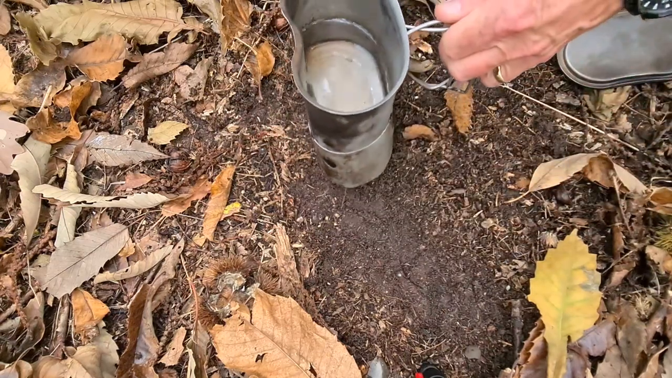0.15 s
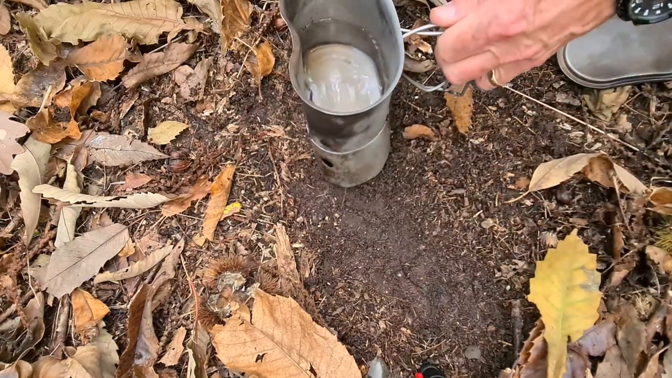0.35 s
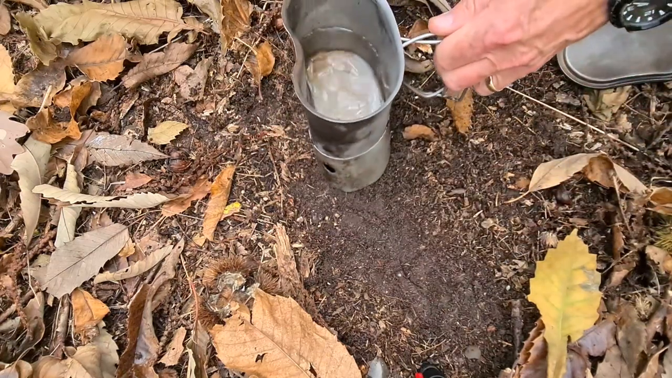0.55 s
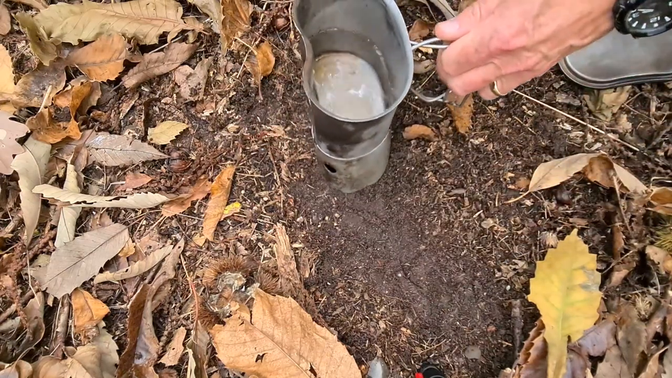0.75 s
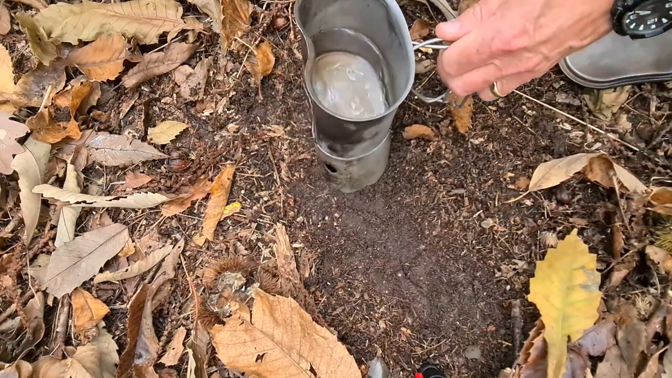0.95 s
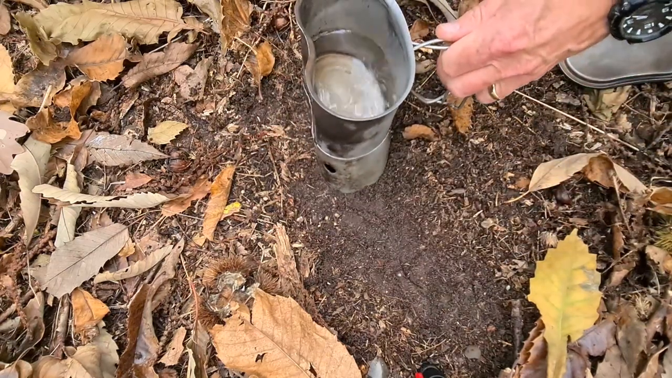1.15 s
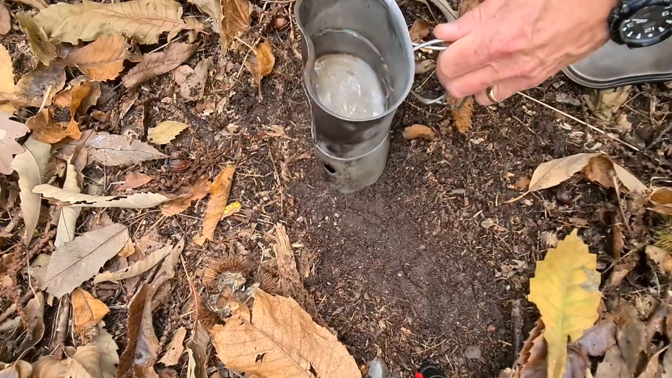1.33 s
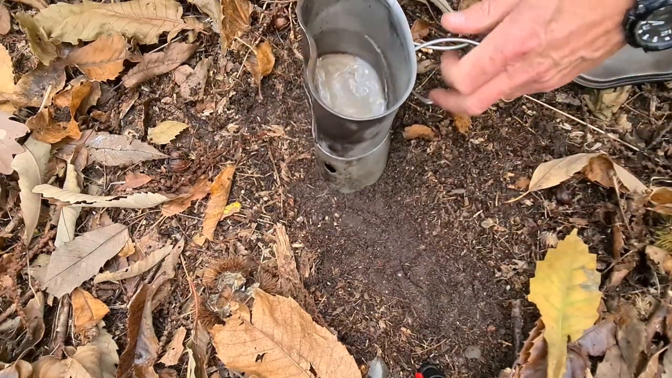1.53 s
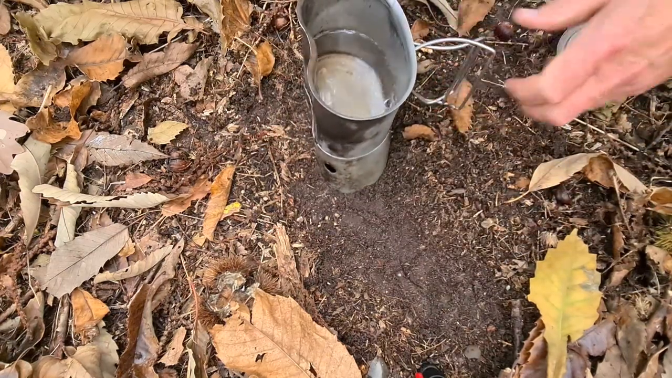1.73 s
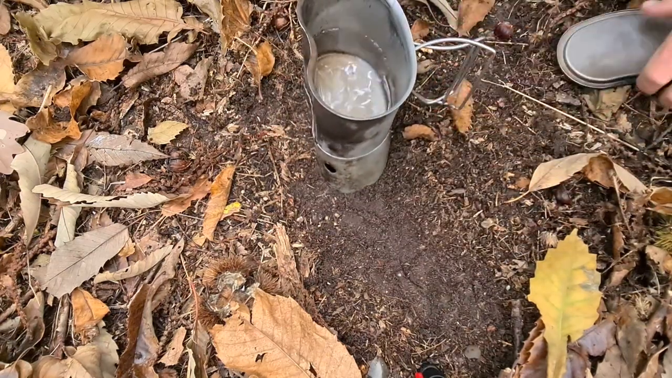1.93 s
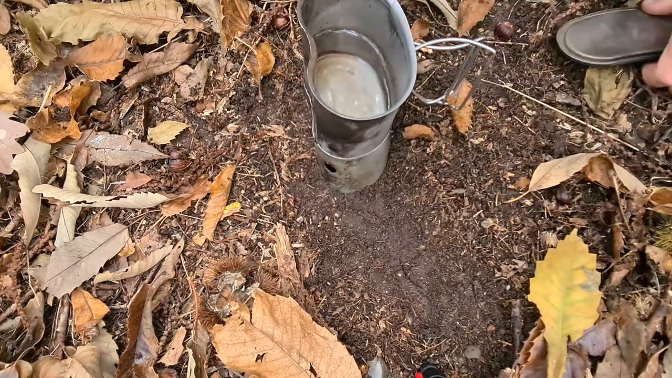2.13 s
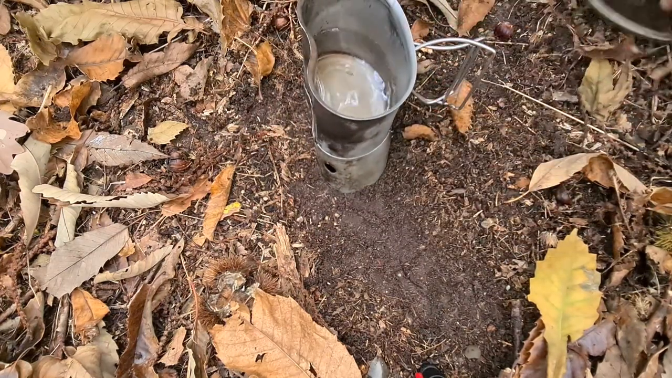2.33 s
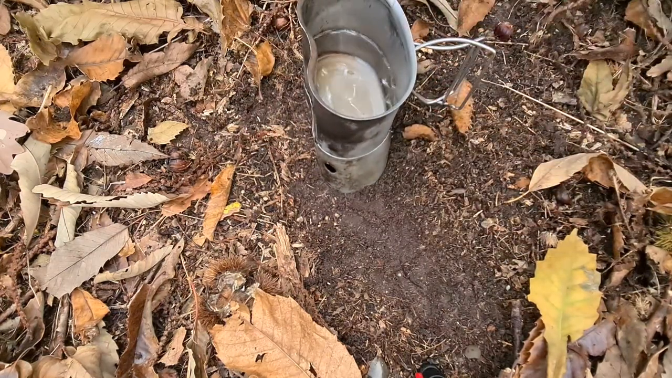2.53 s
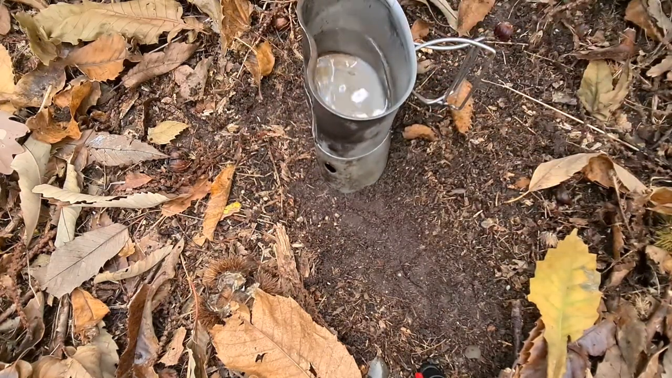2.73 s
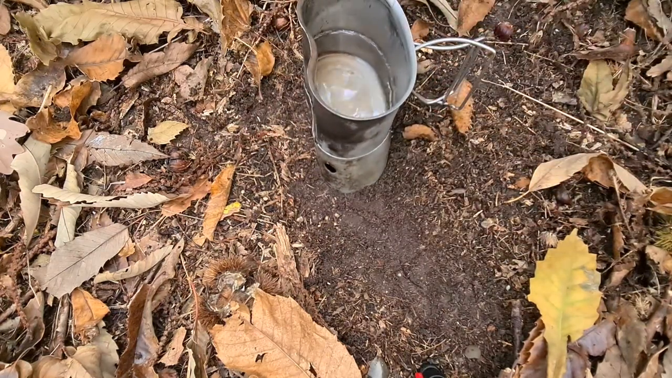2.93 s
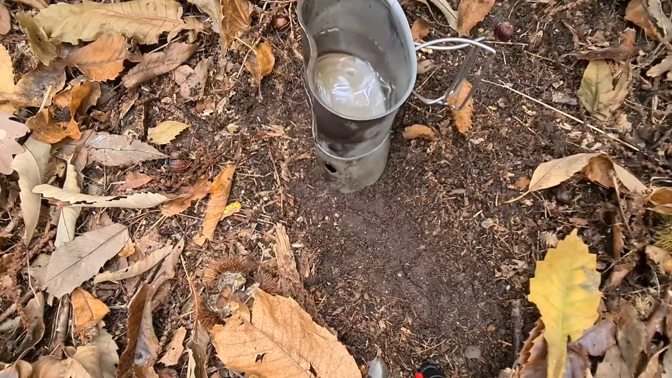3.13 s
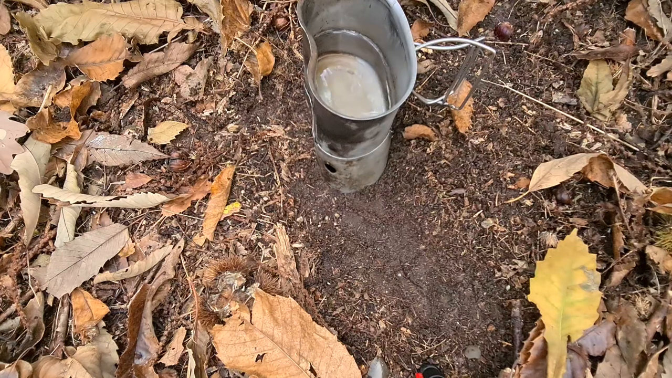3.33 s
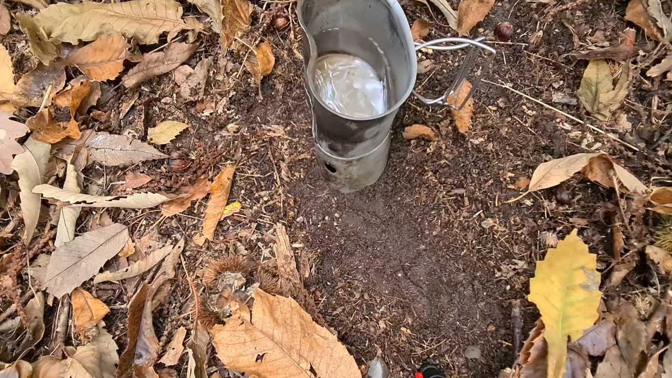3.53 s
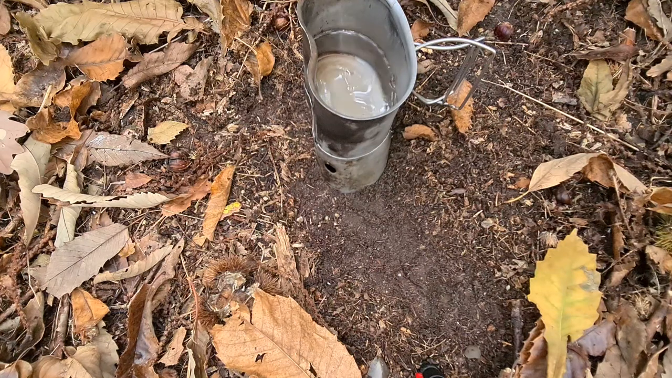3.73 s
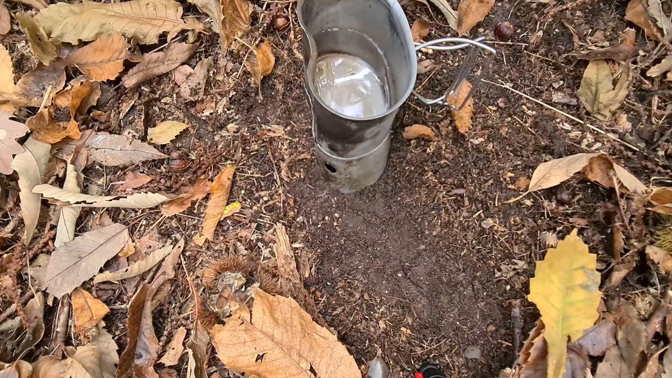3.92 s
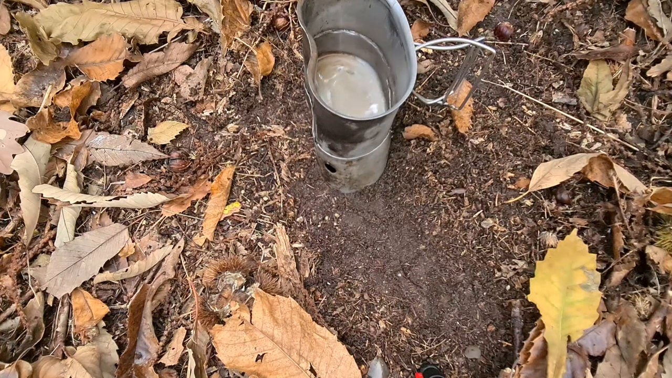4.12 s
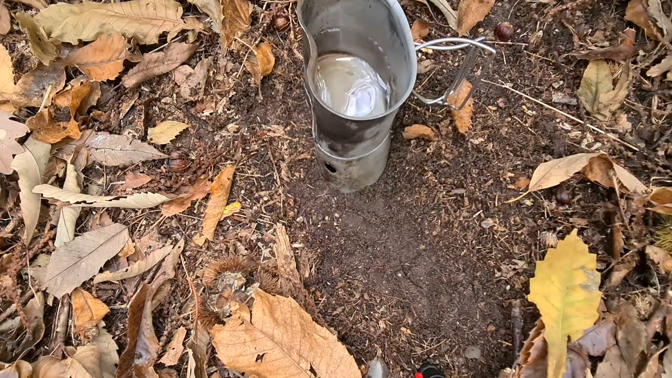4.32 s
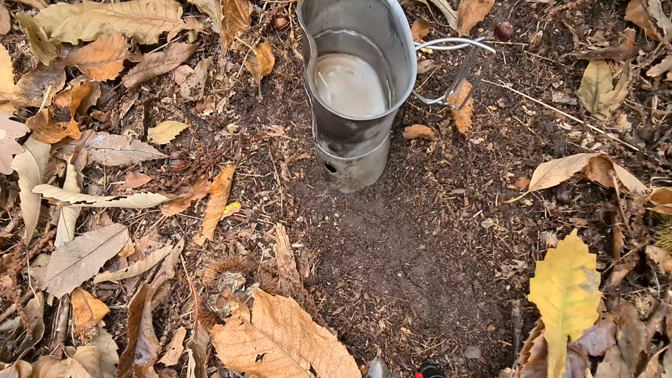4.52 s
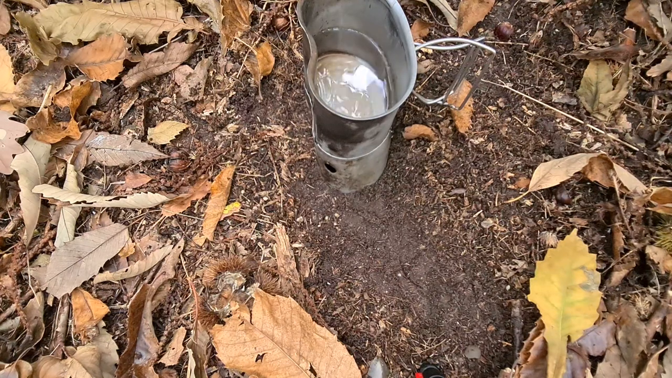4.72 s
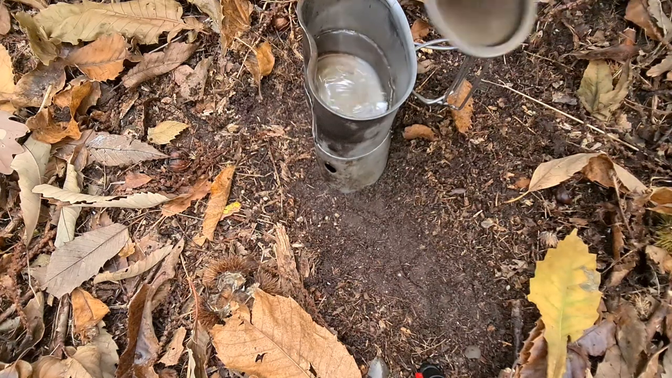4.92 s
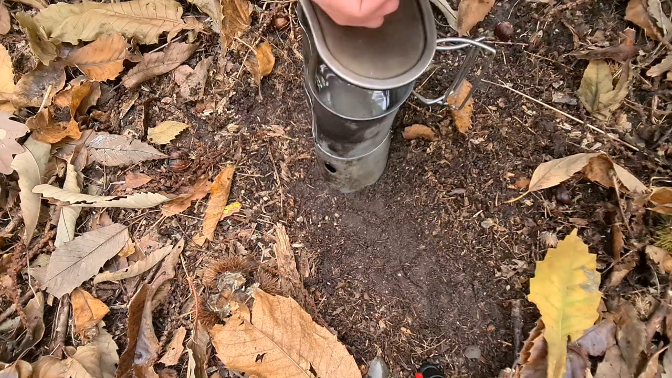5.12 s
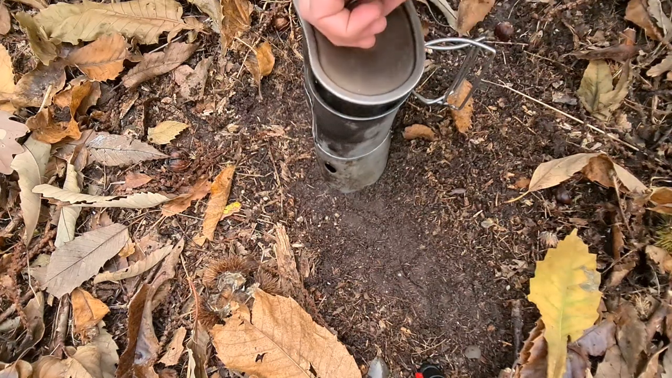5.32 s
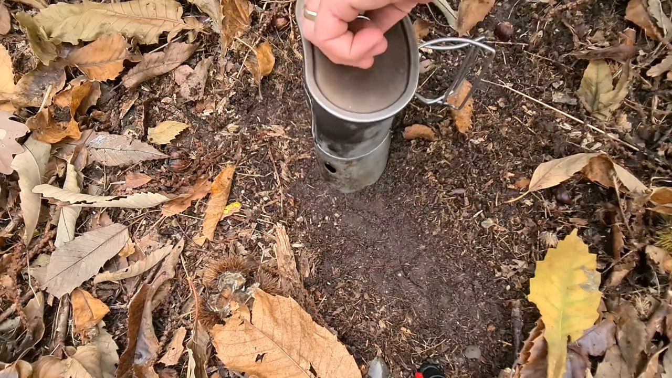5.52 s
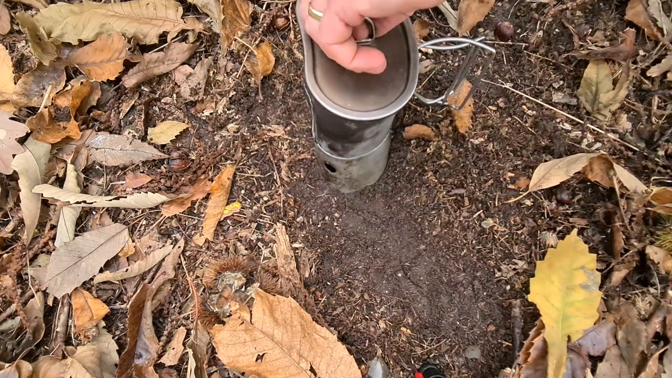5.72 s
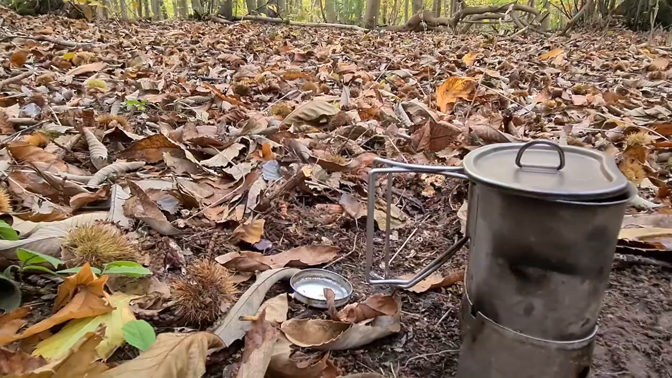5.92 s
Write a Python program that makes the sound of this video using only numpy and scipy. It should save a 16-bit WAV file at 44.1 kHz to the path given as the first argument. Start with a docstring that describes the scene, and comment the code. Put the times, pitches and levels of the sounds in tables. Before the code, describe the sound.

A metal camping pot scrapes on its stand in a quiet wood, leaves rustle, a lid clinks and clanks on, then a close simmering hiss.

```python
"""A metal camping pot is nudged into place on its burner stand in a wood; its lid, pulled out of dry leaves,
clinks in the hand, has its wire loop flipped up and clanks onto the pot: decaying modes plus a wash of noise.
Far off an engine idles as beating sine orders, small birds whistle faintly, and noise makes roar and rumble.
Leaves and sleeve are crackling noise. At the very end the microphone is suddenly close to the pot, which
hisses and ticks over the flame: grainy noise, short bursts and two resonances."""
import sys
import numpy as np
from scipy import signal
from scipy.fft import rfft, irfft, next_fast_len
from scipy.io import wavfile
from scipy.ndimage import uniform_filter1d, map_coordinates

SR = 44100
rng = np.random.default_rng(int(sys.argv[2]) if len(sys.argv) > 2 else 0)


def unload_wav(signal):
    """Save mono or channel-first audio to the path in sys.argv[1] as 16-bit WAV at rate SR, clipped to [-1, 1]."""
    wavfile.write(
        sys.argv[1],
        SR,
        np.round(np.clip(np.atleast_2d(signal).T, -1, 1) * 32767).astype(np.int16),
    )


N = 267246


def amp(db):
    """Decibels to gain."""
    return 10 ** (np.asarray(db) / 20)


def unit(x):
    """Scale to rms 1."""
    return x / np.sqrt(np.mean(x ** 2) + 1e-20)


def clock():
    """The time of every sample in seconds."""
    return np.arange(N) / SR


def along(points, hz):
    """(Hz, value) points joined on a log frequency axis."""
    f, v = np.transpose(points)
    return np.interp(np.log(hz + 1), np.log(f + 1), v)


def curves(rows):
    """One value per sample for each column after the time."""
    s, *cols = np.transpose(rows)
    return [np.interp(clock(), s, c) for c in cols]


def wobble(rate):
    """A smooth random curve, rate knots a second."""
    return map_coordinates(rng.standard_normal(400), [clock() * rate], mode="mirror")


def ripple(hz, depth_db):
    """Crowded resonances: random peaks and dips in dB, with knots 90 Hz apart."""
    return depth_db * map_coordinates(rng.standard_normal(300), [hz / 90], mode="mirror")


def filtered(x, response):
    """x times a response of frequency."""
    n = x.shape[-1]
    padded = next_fast_len(n + 8192)
    hz = np.fft.rfftfreq(padded, 1 / SR)
    return irfft(rfft(x, padded) * response(hz), padded)[..., :n]


def stereo(pair, colour, alike):
    """Two unrelated signals become left and right, jointly of rms 1, with a colour in dB and a likeness."""
    def mid_side_gains(hz):
        turn = np.arccos(np.clip(along(alike, hz), -1, 1)) / 2
        return amp(colour(hz)) * [np.cos(turn), np.sin(turn)]

    mid, side = filtered(pair, mid_side_gains)
    return unit(np.array([mid + side, mid - side]))


def rush(spectrum, alike):
    """Smooth coloured stereo noise."""
    return stereo(rng.standard_normal((2, N)), lambda hz: along(spectrum, hz), alike)


def patches(x, depth_db):
    """Shifting, short-lived resonances: a random gain over frequency and time."""
    z = signal.stft(x, nperseg=512)[2]
    field = uniform_filter1d(rng.standard_normal(z.shape[1:]), size=5, axis=0)
    field = uniform_filter1d(field, size=6, axis=1)
    patched = signal.istft(z * amp(depth_db * unit(field)), nperseg=512)[1]
    return unit(patched[:, :N])


# Left-right likeness at the microphone, all but the closest metal: freq_hz, correlation
LIKENESS = [(60, 0.93), (130, 0.93), (290, 0.63), (640, 0.34), (1400, -0.31), (3000, -0.1), (8000, -0.016)]


def crackle(spectrum, rate, spread_db, smooth):
    """Millisecond grains of very unequal size and colour on a bed of smooth noise."""
    starts = rng.random(N) < rate / SR
    sizes = starts * amp(spread_db * np.minimum(rng.exponential(size=N), 3))
    grains = unit(signal.lfilter([1], [1, -np.exp(-1 / (0.0021 * SR))], sizes))
    noise = (grains + smooth) * rng.standard_normal((2, N))
    return patches(stereo(noise, lambda hz: along(spectrum, hz), LIKENESS), depth_db=3)


def add(track, s, sound):
    """Mix a sound into the track at time s."""
    part = track[:, round(s * SR):][:, :sound.shape[1]]
    part += sound[:, :part.shape[1]]


def swell(s, db, half):
    """A bell-shaped rise and fall in amplitude around time s."""
    return amp(db) * np.exp(-.5 * ((clock() - s) / half) ** 2)


def strokes(rows, attack_s, t60):
    """Level of movements: each rises, holds until its length is over and dies away."""
    t = clock()
    level = np.zeros(N)
    for s, length, db in rows:
        fall_db = 60 * np.maximum(t - s - length, 0) / t60
        level += amp(db - fall_db) * np.clip((t - s) / attack_s, 0, 1)
    return level


def snaps(rows, spectrum, t60):
    """Tiny dry cracks: bursts of noise that die at once."""
    track, t = np.zeros((2, N)), np.arange(SR // 50) / SR
    for s, db in rows:
        burst = stereo(rng.standard_normal((2, len(t))), lambda hz: along(spectrum, hz), LIKENESS)
        add(track, s, amp(db - 60 * t / t60) * burst)
    return track


# Left-right likeness of metal wash and simmer close by: freq_hz, correlation
NEAR_LIKENESS = [(130, 1), (640, .76), (1400, 0.73), (3100, -0.17), (15000, 0.59)]
# a faint lead-in swells before each contact
LEAD_IN_S = .04
# a contact that chatters for this long is loose and damps the metal less
LOOSE_S = 0.0196
# treble of a contact: dB gained per dB of force, and dB lost per dB of bass
TREBLE_PER_FORCE, TREBLE_PER_BASS = 0.29, 0.24
# the left port hears the metal first; its phase lead, half on each side, levels off for short waves
PORT_LEAD_S, MOST_APART_RAD = .00009, 0.99


def contacts(rows, modes, spectrum, wash_db, wash_t60, treble_db, damping, lead_in_db, lead_in_t60):
    """Metal on metal: a faint lead-in, then clear modes and a wash of noise; chatter slows the early decay."""
    track, t = np.zeros((2, N)), np.arange(SR // 2) / SR - LEAD_IN_S
    hz, mode_db, t60 = np.transpose(modes)[:, :, None]
    hardest_db = max(row[1] for row in rows)
    apart = np.minimum(np.pi * hz * PORT_LEAD_S, MOST_APART_RAD)
    age = np.maximum(t, 0)
    lead_in = amp(lead_in_db + 60 * np.minimum(t, 0) / lead_in_t60)
    onset = lead_in + (1 - lead_in) * (1 - np.exp(-age / .0003))
    for s, db, bass_db, chatter in rows:
        # hard blows on the edge are bright, soft and flat ones dull
        high_db = treble_db + TREBLE_PER_FORCE * (db - hardest_db) - TREBLE_PER_BASS * bass_db
        tilt = lambda f: along([(700, bass_db), (2600, 0.0023), (7000, high_db)], f)
        # a firm contact shortens the ring
        grip = 1 + damping * np.exp(-chatter / LOOSE_S)
        fade = lambda life: amp(-60 * grip * (np.hypot(age, chatter) - chatter) / life)
        # the shifting contact jostles the phase of every mode
        jostle = 0.03 * np.cumsum(rng.standard_normal((len(hz), len(t))), axis=1)
        phase = 2 * np.pi * (hz * t + rng.random(hz.shape)) + jostle
        partials = amp(mode_db + tilt(hz) + rng.normal(0, 2.4, hz.shape))
        ringing = partials * fade(t60)
        ring = np.array([(ringing * np.sin(phase + side * apart)).sum(0) for side in (1, -1)])
        ring *= np.sqrt(2) / np.linalg.norm(partials)
        colour = lambda f: along(spectrum, f) + tilt(f) + ripple(f, 4.5)
        wash = stereo(rng.standard_normal((2, len(t))), colour, NEAR_LIKENESS)
        sound = ring + amp(wash_db) * wash * fade(wash_t60)
        add(track, s - LEAD_IN_S, amp(db) * onset * sound / np.hypot(1, amp(wash_db)))
    return track


# Far engine's slow cycle: time_s, cycle_rate_hz
ENGINE_SPEED = [(0, 19.3), (.8, 19.85), (1.5, 19.3), (3, 18.8), (4, 18.98), (4.8, 18.1), (5.9, 18.8)]
# How loud the firing tone arrives from far off: time_s, level_db
FIRING_LEVEL = [(0.0, -50.5), (0.13, -40.5), (1.8, -52), (2.11, -43.5), (2.57, -41.5), (4.1, -53),
                (4.6, -58), (5.57, -43.5), (5.92, -45)]
# The other orders before their joint levelling: multiple_of_cycle_rate, level_db
ENGINE_ORDERS = [(3, -22), (5, 3), (6, -22), (7, -10), (8, -3.5), (9, -8), (10, -13), (11, -23.5), (12, -8),
                 (13, -10), (14, -20), (16, -12.5), (17, -16)]
# Far roar of the open air: time_s, level_db
ROAR_LEVEL = [(0, -52.5), (.6, -51), (1.1, -51.5), (1.35, -50.5), (1.7, -54), (2.2, -50), (2.8, -54),
              (4.1, -54), (5, -55.5), (5.4, -49.5)]
# other orders: mean level, and the shares they follow of the dB swings of firing tone and roar
ORDERS_DB, ORDERS_FOLLOW, ORDERS_WITH_ROAR = -49.5, 0.14, 0.67


def engine():
    """Beating orders of a slow cycle: the fourth is the firing tone;
    the rest swell mostly with the far roar, a little with it."""
    firing_db, = curves(FIRING_LEVEL)
    roar_db, = curves(ROAR_LEVEL)
    orders_db = ORDERS_DB + ORDERS_FOLLOW * (firing_db - firing_db.mean())
    orders_db += ORDERS_WITH_ROAR * (roar_db - roar_db.mean())
    angle = 2 * np.pi * np.cumsum(curves(ENGINE_SPEED)[0]) / SR
    others = np.zeros(N)
    for k, db in ENGINE_ORDERS:
        # the orders line up loosely, and each fades in and out on its long way
        lag = rng.normal(0, .55) + k * np.pi / 2 * (k > 5) + .15 * wobble(4)
        others += amp(db + 2.5 * wobble(5)) * np.cos(k * angle + lag)
    return amp(firing_db) * unit(np.cos(4 * angle)) + amp(orders_db) * unit(others)


# Colour of the far roar: freq_hz, density_db
ROAR_COLOUR = [(200, -16.5), (320, -6.5), (400, -4.5), (520, 1), (800, 0), (1050, -2), (1350, -2.5),
               (1600, -12.5), (2000, -16), (2500, -41), (4000, -54)]
# Colour of the low rumble: freq_hz, density_db
RUMBLE_COLOUR = [(15, -23), (28, 0.5), (40, -5), (55, 10), (110, 0), (220, -4), (400, -19.5), (800, -67.5)]
# Colour of the thin hiss of air: freq_hz, density_db
AIR_COLOUR = [(800, -15), (2500, 9), (4500, 3.5), (7000, 1.5), (8500, -24.5), (10500, -9), (12500, -4),
              (16000, -13.5)]


def outdoors():
    """Open air as coloured noise: a low rumble and far roar that swell together, and a steady thin hiss."""
    roar_db, = curves(ROAR_LEVEL)
    roar = amp(roar_db + 0.7 * wobble(4.1)) * rush(ROAR_COLOUR, LIKENESS)
    rumble = amp(roar_db + 3 + 1.2 * wobble(6.6)) * rush(RUMBLE_COLOUR, LIKENESS)
    return roar + rumble + amp(-77.5) * rush(AIR_COLOUR, LIKENESS)


# Pot against its stand, near the microphone: start_s, level_db, bass_db, chatter_s
NUDGES = [(.395, -58, -14, 0.014), (.459, -47.5, -9, 0.0088), (.494, -39.5, -2, 0.013),
          (.508, -38, 4, 0.025), (.533, -45, -8, .004), (1.405, -47, 14, 0.0088)]
# Modes of the pot: freq_hz, level_db, t60_s
POT_MODES = [(865, 0, 0.19), (963, 3.5, 0.065), (1042, 2.5, 0.096), (1300, -3, 0.09), (1670, -8.5, 0.059),
             (1960, -12.5, 0.054), (2250, -9.5, 0.14), (2820, -10, 0.099), (3030, -16, 0.11),
             (4590, -21, 0.091), (5510, -18, 0.15), (7550, -22, 0.095)]
# Colour of the gritty wash under the pot: freq_hz, density_db
GRIT_COLOUR = [(400, -13), (900, 6.5), (1400, -7), (2800, -11), (4000, -23), (7500, -36), (9000, -58),
               (16000, -33)]


def nudges():
    """The pot's modes and a gritty wash sound as it is pushed about on the stand."""
    return contacts(NUDGES, POT_MODES, GRIT_COLOUR, wash_db=-9.5, wash_t60=0.055,
                    treble_db=0, damping=1.2, lead_in_db=-6, lead_in_t60=0.055)


def woods(x):
    """Trunks scatter back a dull tail: noise dying by 60 dB in half a second."""
    t = np.arange(SR) / SR
    colour = lambda hz: along([(500, -4.5), (3000, -5.5), (9000, -9.0)], hz)
    tail = stereo(rng.standard_normal((2, SR)), colour, LIKENESS) * amp(-60 * t / 0.5)
    return signal.fftconvolve(x, tail / np.linalg.norm(tail[0]), axes=1)[:, :N]


# Soft grating of the pot on the stand: start_s, length_s, level_db
SETTLING = [(.51, 0.22, -54.5)]


def settling():
    """Fine slips of the pot's base keep its modes faintly alive: crackle through the pot's resonances."""
    def ring(f):
        return sum(amp(db) / (1 + 1j * (f - hz) * np.pi * t60 / np.log(1000)) for hz, db, t60 in POT_MODES)

    colour = [(500, 15.5), (1100, -1), (3000, -5.0), (4500, -2.0), (8000, -27)]
    grating = filtered(crackle(colour, rate=400, spread_db=5.5, smooth=0.96), ring)
    return strokes(SETTLING, attack_s=0.035, t60=.6) * unit(grating)


# Lid gripped, dragged and pulled free of the leaves: start_s, length_s, level_db
LEAF_STROKES = [(1.9, .11, -62.5), (2.03, 0.18, -53), (2.21, .13, -46)]
# Dry leaves snapping: start_s, level_db
LEAF_SNAPS = [(1.928, -52), (1.978, -44), (1.991, -45), (2.149, -41.5), (2.325, -31.5), (2.331, -31.5)]
# Colour of the dry leaves: freq_hz, density_db
LEAF_COLOUR = [(1060, -13), (1800, -4.5), (2780, -3), (3370, -3), (3970, -2.5), (6660, -2.5), (7640, -3),
               (9160, -13), (13500, -10), (15800, -14.5)]


def leaves():
    """The lid slides out of dry leaves in three ever stronger pulls: dense crackle and a few sharper snaps."""
    pulls = strokes(LEAF_STROKES, attack_s=0.026, t60=0.19)
    rustle = pulls * crackle(LEAF_COLOUR, rate=2000, spread_db=3, smooth=1.0)
    return rustle + snaps(LEAF_SNAPS, LEAF_COLOUR, t60=0.0097)


# Spells of light rubbing while the lid is handled: start_s, length_s, level_db
RUBBING = [(2.41, 0.15, -66.5), (3.35, 0.81, -82), (4.14, 0.19, -71.5), (4.55, 0.086, -64.5),
           (4.7, 0.4, -75.5), (5.46, .06, -57.5), (5.72, 0.068, -69.5)]
# Single firmer brushes of sleeve and fingers: peak_s, level_db
BRUSHES = [(2.723, -67), (2.83, -69.5), (2.895, -62.5), (3.04, -62), (3.765, -55.5), (4.508, -59.5),
           (5.87, -49.5)]
# Colour of the sleeve, also of the hot metal's ticks: freq_hz, density_db
SLEEVE_COLOUR = [(1200, -22.5), (2300, -3), (4000, -3.5), (6000, -1.5), (7700, -2.5), (9000, -18.5),
                 (12000, -15), (16000, -18.5)]
BRUSH_HALF_S = 0.018


def brushes():
    """Sleeve and fingers rub over the lid: crackle in fluttering spells and short soft swells."""
    cloth = crackle(SLEEVE_COLOUR, rate=540, spread_db=3, smooth=2.2)
    rub = filtered(cloth, lambda hz: amp(ripple(hz, 4)))
    flutter_db = 2 * wobble(42)
    spells = strokes(RUBBING, attack_s=.03, t60=0.484) * amp(flutter_db)
    firm = sum(swell(s, db, BRUSH_HALF_S) for s, db in BRUSHES)
    return (spells + firm) * unit(rub)


# Thin chirps of small birds far off in the trees: start_s, pitch_hz (at the start), level_db
CHIRPS = [(2.435, 6200, -62), (2.48, 7360, -62), (2.594, 6500, -62), (2.695, 6100, -66), (4.155, 6900, -67),
          (4.294, 5430, -59), (4.67, 5515, -60), (4.715, 5140, -64.5), (4.77, 4920, -67.5)]
CHIRP_S, CHIRP_FALL_HZ_PER_S = 0.05, 5450


def birds():
    """Short falling, wavering whistles, blurred by the trees with a noise tail."""
    track, age = np.zeros((2, N)), np.arange(int(CHIRP_S * SR)) / SR
    for s, start_hz, db in CHIRPS:
        hz = start_hz - CHIRP_FALL_HZ_PER_S * age + 110 * wobble(250)[:len(age)]
        whistle = np.sin(np.pi * age / CHIRP_S) * np.sin(2 * np.pi * np.cumsum(hz) / SR)
        add(track, s, amp(db) * whistle[None])
    t = np.arange(SR // 2) / SR
    # a dense early blur and a weaker, longer tail
    trees = rng.standard_normal((2, len(t))) * (amp(-60 * t / 0.017) + amp(-39 - 60 * t / 0.2))
    return signal.fftconvolve(track, trees / np.linalg.norm(trees[0]), axes=1)[:, :N]


# Lid clinking in the hand, near the microphone: start_s, level_db, bass_db, chatter_s
CLINKS = [(3.026, -52.5, -22, 0.0032), (3.673, -54.5, -21, 0.0034), (3.711, -48, -8, .004),
          (3.743, -40, -9, 0.0037), (3.971, -52, 11, .008)]
# Modes of the lid held in the hand: freq_hz, level_db, t60_s
LID_MODES = [(1365, 3, 0.046), (2235, -5, 0.2), (2770, -5.5, 0.073), (3594, -1, 0.097), (3900, 3, 0.035),
             (4970, -5, 0.15), (6270, -15, 0.14), (6060, -24, 0.034), (7940, -8, 0.046)]
# Colour of the wash of the lid's sheet metal: freq_hz, density_db
SHEET_COLOUR = [(120, -21), (250, -5.5), (420, -9), (560, -6), (900, 3), (1350, 0.5), (1900, -5.5),
                (2800, 0.5), (4200, -7), (5000, -17.5), (5900, -12), (7500, -19), (10500, -24),
                (15500, -26)]


def clinks():
    """Small knocks ring the hand-held lid's modes over a wash of sheet metal."""
    return contacts(CLINKS, LID_MODES, SHEET_COLOUR, wash_db=-0.5, wash_t60=0.069,
                    treble_db=-1.5, damping=1.1, lead_in_db=-7.5, lead_in_t60=.05)


# Wire loop clicking as it is flipped up: start_s, level_db, bass_db, chatter_s
LOOP_CLICKS = [(4.014, -41.5, -12, 0.00071), (4.44, -26.5, 7, .0015), (4.456, -38, -24, 0.0039)]
# Modes of the lid's wire loop: freq_hz, level_db, t60_s
LOOP_MODES = [(1420, -2, 0.024), (2670, -4, 0.016), (3990, 0, 0.014), (5000, -13, 0.014), (6540, -5, 0.015),
              (8140, -12, 0.016)]
# Colour of the wash of wire and rim: freq_hz, density_db
WIRE_COLOUR = [(500, -35.5), (1300, 2.5), (2500, 0.5), (4000, -1.5), (6500, 6), (8000, -10), (9500, -15.5),
               (16000, -12)]


def loop_clicks():
    """The flipped wire loop clicks with very short modes and a bright wash."""
    return contacts(LOOP_CLICKS, LOOP_MODES, WIRE_COLOUR, wash_db=-4, wash_t60=0.038,
                    treble_db=1.5, damping=0.11, lead_in_db=-16, lead_in_t60=0.036)


# Lid landing and rattling on the pot: start_s, level_db, bass_db, chatter_s
CLANKS = [(5.406, -17.5, -5.5, 0.023), (5.426, -12, -7.5, 0.01), (5.445, -16.5, 9.5, .002),
          (5.452, -12.5, -0.5, 0.0035), (5.502, -36.5, 10, 0.0088), (5.554, -17.5, -2, 0.0015)]
# Modes of the lid on the pot: freq_hz, level_db, t60_s
LID_ON_POT_MODES = [(518, -8.5, 0.25), (573.7, -5, 0.19), (696, -14, 0.098), (856, -14.5, 0.046),
                    (1148, -1.5, 0.14), (1220, -9.5, 0.25), (1336, 3.5, 0.11), (1350, -5, 0.05),
                    (1682, -0.5, .15), (1757, -7.5, 0.26), (2154, -4, 0.099), (2500, -7.5, 0.031),
                    (2790, -12, 0.31), (2874, -1.5, 0.19), (3270, -10.5, .08), (3960, -6.5, 0.027),
                    (4420, -3.5, 0.07), (5500, -10.5, 0.051), (5620, -10, 0.14), (6210, -10, 0.086),
                    (6940, -13.5, 0.14)]
# Modes of the lid's rim: freq_hz, level_db, t60_s
RIM_MODES = [(3163, -3.5, .11), (3140, 5, 0.13), (3923, -1, 0.14), (3980, -10.5, 0.08), (7240, -8, 0.09),
             (7480, -19, .08), (8600, -16.5, 0.081), (9270, -15.5, .05), (13800, -8.5, .04)]
# the rim's blows weaken once the lid seats: gains in dB before and after
SEATS_S, SEATING_S, FREE_RIM_DB, SEATED_RIM_DB = 5.44, 0.0091, 1.5, -8.5


def clank():
    """The lid lands in a quick rattle; its rim sounds strongly at first and weakly once it lies on the pot."""
    blow = dict(treble_db=1.5, damping=0.86, lead_in_db=-24, lead_in_t60=0.048)
    body = contacts(CLANKS, LID_ON_POT_MODES, SHEET_COLOUR, wash_db=3, wash_t60=0.11, **blow)
    rim_blows = []
    for s, db, bass_db, chatter in CLANKS:
        rim_db = np.interp(s, [SEATS_S, SEATS_S + SEATING_S], [FREE_RIM_DB, SEATED_RIM_DB])
        rim_blows.append((s, db + rim_db, bass_db, chatter))
    rim = contacts(rim_blows, RIM_MODES, WIRE_COLOUR, wash_db=-14.0, wash_t60=0.054, **blow)
    return body + rim


# air shut in under the lid: pitch, level against the bass of the blow, decay
HOLLOW_HZ, HOLLOW_DB, HOLLOW_T60_S = 635, -9.5, 0.052


def hollow():
    """Once the lid closes the pot, each blow sounds the air inside as one decaying sine."""
    track, t = np.zeros((2, N)), np.arange(SR // 4) / SR
    tone = np.sin(2 * np.pi * HOLLOW_HZ * t)
    for s, db, bass_db, _ in CLANKS:
        if s >= SEATS_S:
            level = amp(db + bass_db + HOLLOW_DB - 60 * t / HOLLOW_T60_S)
            add(track, s, (level * tone)[None])
    return track


# Lid's edge singing as it is slid round: peak_s, pitch_hz, level_db, half_length_s
SQUEALS = [(5.752, 2750, -65.5, 0.0085), (5.812, 2820, -68, 0.014), (5.85, 2210, -56.5, 0.0046),
           (5.863, 2790, -56.5, 0.011)]


def squeals():
    """Stick and slip keeps one mode of the lid sounding for a moment: a swelling, unsteady sine."""
    song = np.zeros(N)
    for s, hz, db, half in SQUEALS:
        song += swell(s, db, half) * np.sin(2 * np.pi * hz * clock() + .5 * wobble(60))
    return song


# Resonances of the simmering pot, heard close by: freq_hz, width_hz, level_db
SIMMER_RESONANCES = [(614, 57, -2.5), (1970, 180, -7)]
# Colour of the simmer's hiss: freq_hz, density_db
SIMMER_COLOUR = [(25, -6), (60, 8.5), (150, -4), (400, -5.5), (600, -16), (800, -10), (1400, -7.5),
                 (2000, -18.5), (2700, -15), (6000, -22.5), (9000, -37.5), (16000, -30)]
# Ticks of the hot metal: start_s, level_db
HEAT_TICKS = [(5.953, -39), (5.987, -43.5), (6.007, -37), (6.019, -39), (6.027, -45)]


def simmer():
    """The heated pot hisses as grainy noise and ticks, and its hollow sings as noise through resonances."""
    def resonance(f):
        return sum(amp(db) * 1j * f * w / (c * c - f * f + 1j * f * w) for c, w, db in SIMMER_RESONANCES)

    flame = rush([(300, 7.5), (3000, -1), (6000, -17.0)], NEAR_LIKENESS)
    singing = amp(-41.0) * unit(filtered(flame, resonance))
    hiss = amp(-39) * crackle(SIMMER_COLOUR, rate=270, spread_db=7, smooth=2.1)
    return hiss + singing + snaps(HEAT_TICKS, SLEEVE_COLOUR, t60=0.014)


# the microphone is close to the pot from here on
CLOSE_S = 5.936


def scene():
    """Handling heard from above in the wood, then the simmer from close by."""
    metal = nudges() + settling() + clinks() + loop_clicks() + clank() + hollow() + squeals()
    # left and right trims in dB
    near = (metal + amp(-30) * woods(metal) + leaves() + brushes()) * amp([[-.7], [.7]])
    far = (engine() + outdoors() + birds()) * amp([[-.85], [.85]])
    # a few milliseconds of silence part the two positions
    before = np.clip((CLOSE_S - .007 - clock()) / .001, 0, 1)
    after = np.clip((clock() - CLOSE_S) / .001, 0, 1)
    return before * (near + far) + after * simmer()


# middle of the treble cutoff
TOP_HZ = 15950


def record(dry):
    """The microphone's channel rounds off the highest peaks and keeps nothing above its band limit."""
    rounded = dry / (1 + (dry / .95) ** 6) ** (1 / 6)
    return filtered(rounded, lambda hz: np.clip((TOP_HZ - hz) / 250 + .5, 0, 1))


dry = scene()
out = record(dry)
unload_wav(out)
```